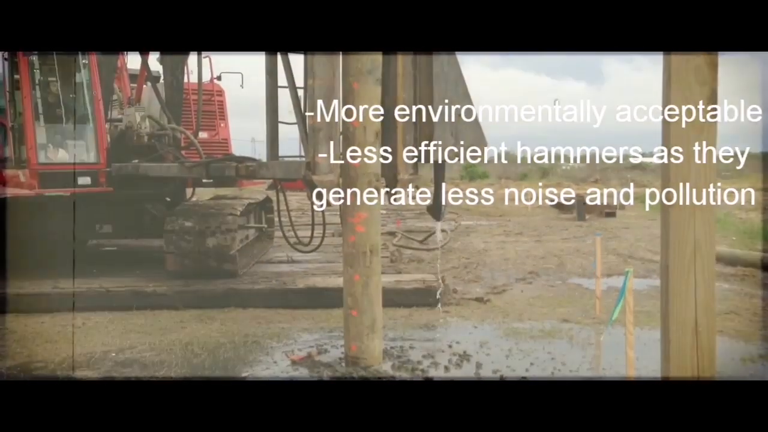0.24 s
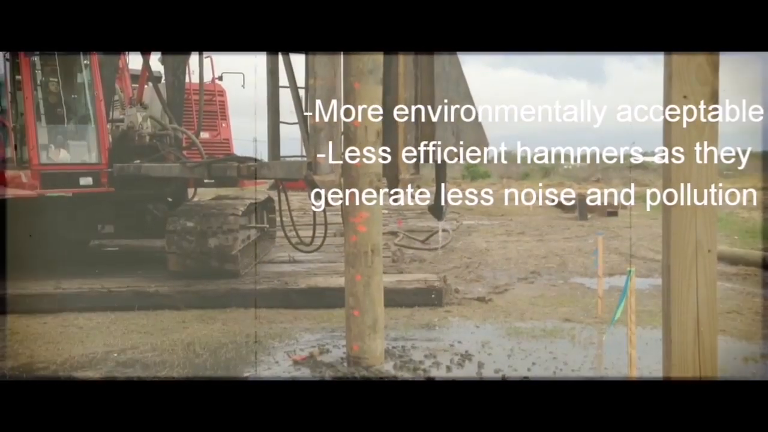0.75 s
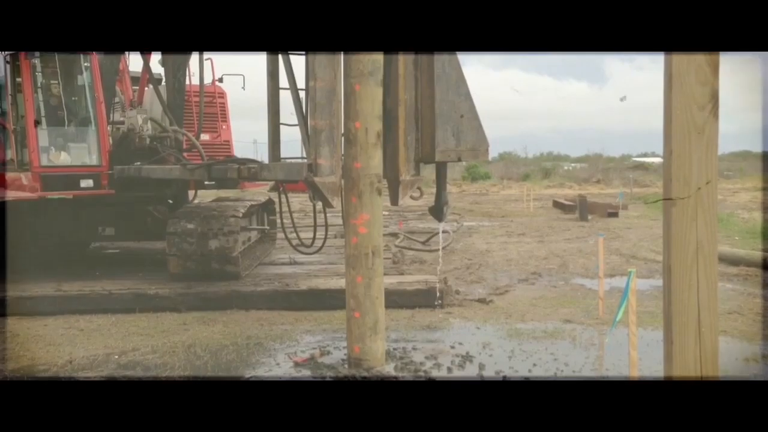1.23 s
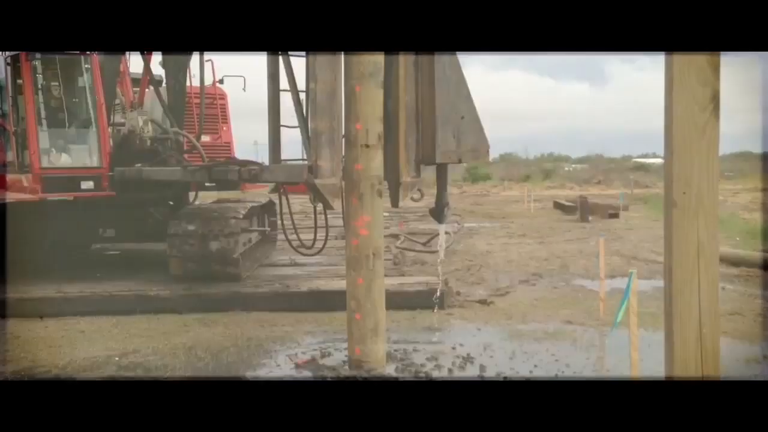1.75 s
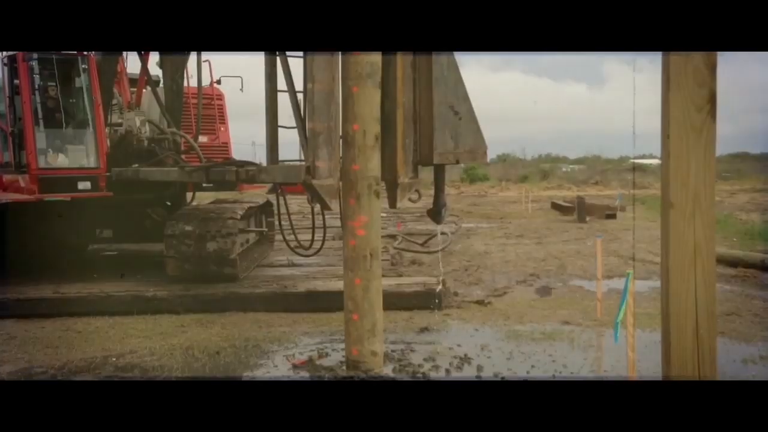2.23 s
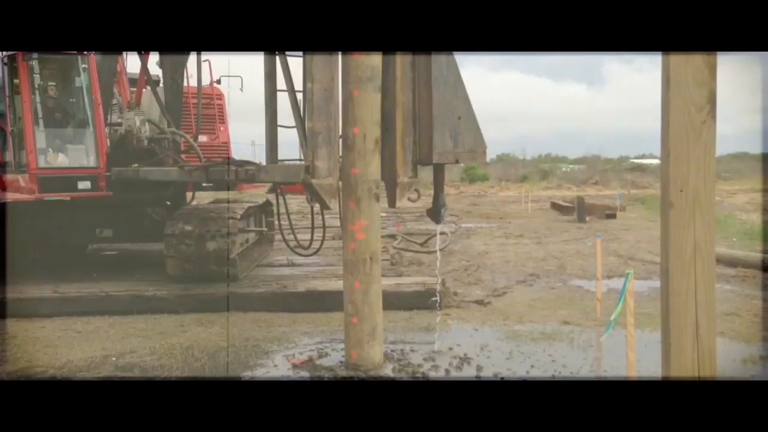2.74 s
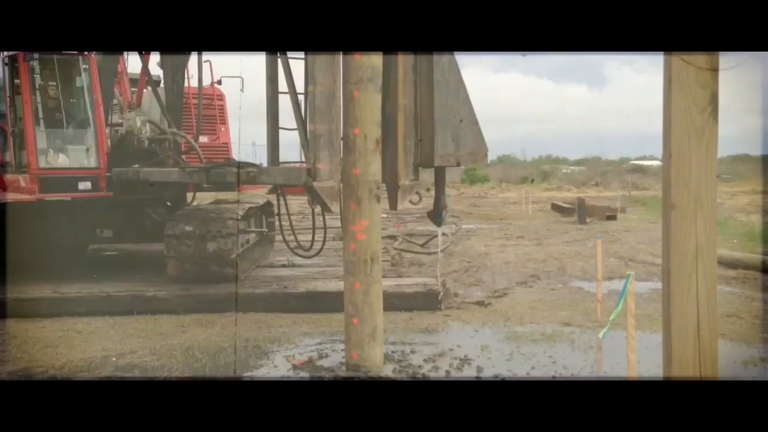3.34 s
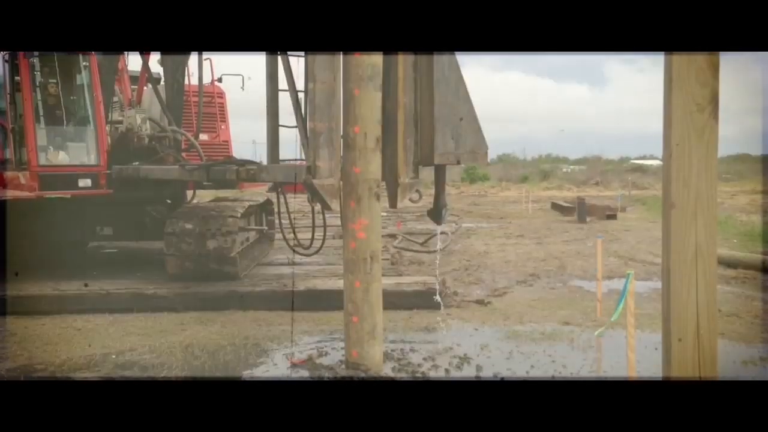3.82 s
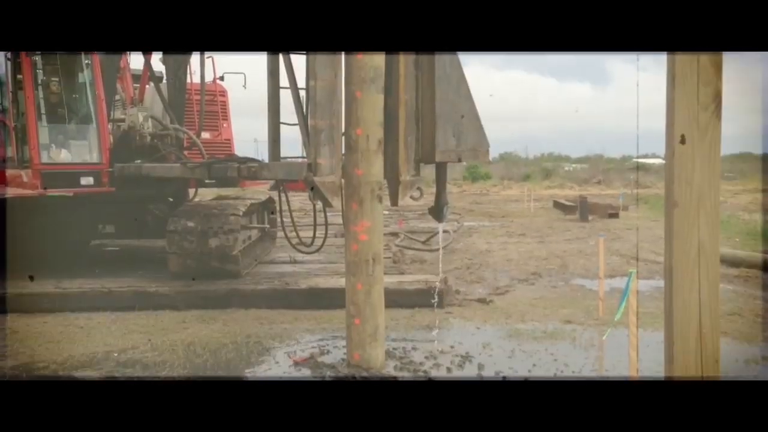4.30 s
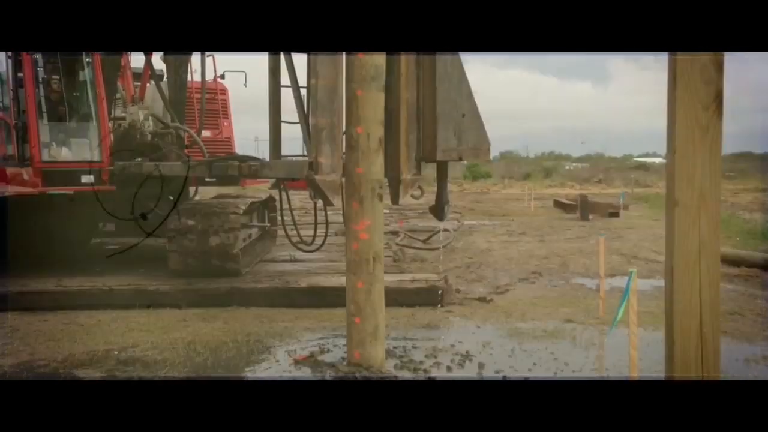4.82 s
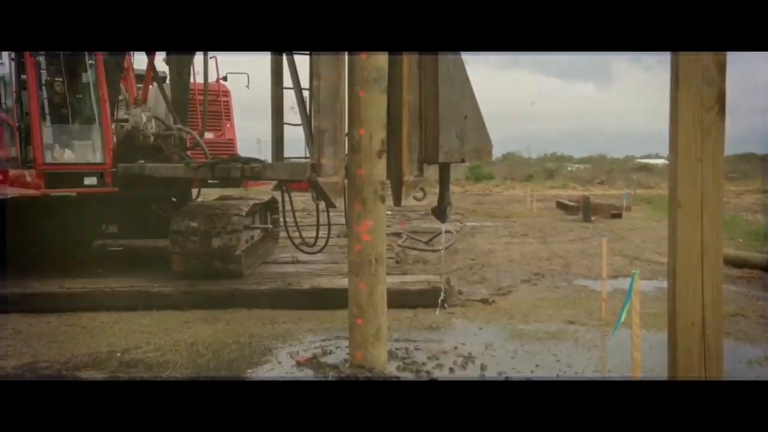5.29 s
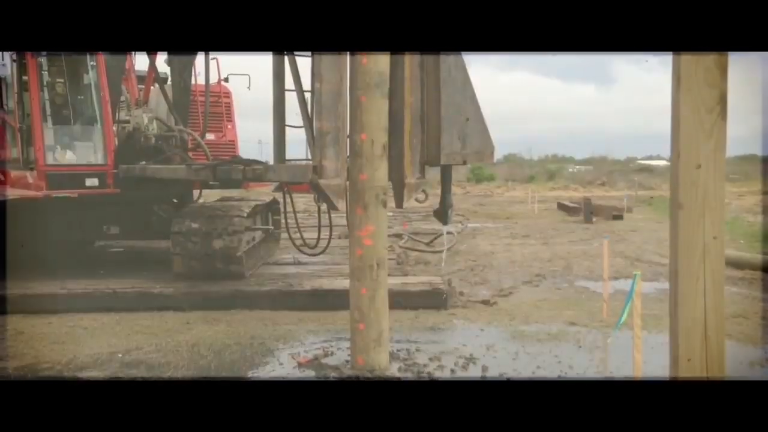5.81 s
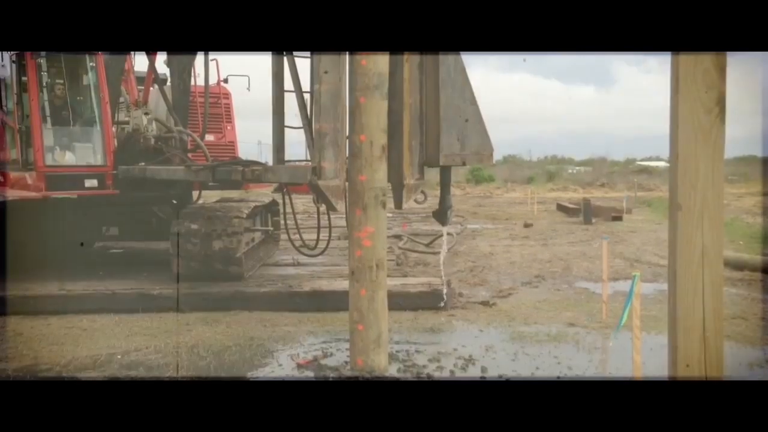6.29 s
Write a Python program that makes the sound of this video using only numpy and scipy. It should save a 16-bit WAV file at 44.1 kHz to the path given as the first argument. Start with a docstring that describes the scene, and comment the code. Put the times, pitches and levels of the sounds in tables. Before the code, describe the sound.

A diesel power pack runs throughout, a low fluttering drone with faint high pump whines, outdoors and heard in mono from fairly close. From 0 to 1.5 s strong, resonant oil hiss fills the foreground, slightly fizzy and easing a little. A dull guide knock leads into the first blow at 1.56 s: a deep, cushioned thump with little ring. Quieter, surging hiss lifts the ram until a valve gushes at 2.2 s and drains away. Soft knocks and a quick rising rush precede the second blow at 2.8 s, harder, with a steel crack, low thud, loose rebound rattle and ringing frame. The cycle repeats: gush at 3.5 s, brighter blow at 4.1 s, gush at 4.9 s, the sharpest clang at 5.4 s. Each rings under a second with a dull site echo. Hiss resumes, and a last gush at 6.35 s fades towards the end over the engine.

```python
"""A diesel power pack drones and whines while oil hisses through hoses, lifting the ram of a pile hammer.
The ram slides down and strikes: each of four blows cracks on steel, thumps the pile, rebounds and rings on.
After each blow oil lifts the ram again, until a valve lets go with a gush.
Flows and rattles are coloured noise, struck steel is a set of fading tones; a limiter flattens the loud peaks."""
import sys
import numpy as np
from scipy import signal
from scipy.fft import rfft, irfft, next_fast_len
from scipy.io import wavfile

SR = 44100
rng = np.random.default_rng(int(sys.argv[2]) if len(sys.argv) > 2 else 0)


def wrap_up_sound(samples):
    """Save the sound to the file named by the first command line argument, as 16-bit audio."""
    columns = np.atleast_2d(samples).T
    # keep every value between -1 and 1, then stretch to whole-number steps
    tamed = np.clip(columns, -1, 1)
    steps = np.round(tamed * 32767).astype(np.int16)
    wavfile.write(sys.argv[1], SR, steps)


N = 288855
TIME = np.arange(N) / SR  # seconds
TAIL = 32000  # length of each struck sound in samples
AFTER = np.arange(TAIL) / SR  # seconds since a strike
LIFT_ATTACK_S, VALVE_SHUT_S, GUSH_ATTACK_S = 0.024, 0.017, 0.028


def amp(db):
    """Turns decibels into a gain."""
    return 10 ** (np.asarray(db) / 20)


def unit(x):
    """Scales a signal to an rms of one."""
    return x / np.sqrt(np.mean(abs(x) ** 2) + 1e-20)


def add(mix, start_s, sound):
    """Lays a sound into the mix, cutting off what runs past the end."""
    part = mix[max(round(start_s * SR), 0):][:len(sound)]
    part += sound[:len(part)]


def noise(colour, size, ripple_db=0):
    """Random noise whose spectrum follows a colour table, with an optional ripple on top."""
    hz = np.fft.rfftfreq(size, 1 / SR)
    table_hz, table_db = np.transpose(colour)
    colour_db = np.interp(np.log(hz + 1), np.log(table_hz + 1), table_db)
    spectrum = rfft(rng.standard_normal(size)) * amp(colour_db + ripple_db)
    return unit(irfft(spectrum, size))


def wander(width_hz, size):
    """Slow random complex signal: it makes a sound waver in strength and phase."""
    coarse_s = np.arange(size // 64 + 2) * 64 / SR
    hz = np.fft.fftfreq(len(coarse_s), coarse_s[1])
    random_phase = np.exp(2j * np.pi * rng.random(len(coarse_s)))
    slow = np.fft.ifft(random_phase / (1 + (2 * hz / width_hz) ** 4))
    return np.interp(np.arange(size) / SR, coarse_s, unit(slow))


def swell(rise, t60):
    """Envelope that builds up in about rise seconds, then falls by 60 dB every t60 seconds."""
    build = 1 - np.exp(-(AFTER / rise) ** 2)
    return build * amp(-60 * np.maximum(AFTER - rise, 0) / t60)


def ring(modes, rough, width_hz):
    """Struck steel rings at its own pitches; loose contact makes each waver by the share rough."""
    out = np.zeros(TAIL)
    for hz, db, t60, rise in modes:
        waver = 1 - rough + rough * wander(width_hz, TAIL)
        tone = (waver * np.exp(2j * np.pi * hz * AFTER)).imag
        out += amp(db) * swell(rise, t60) * tone
    return out


def gate(start, end, attack, release):
    """A valve opens smoothly at start and shuts smoothly at end."""
    opening = 1 - np.exp(-(np.maximum(TIME - start, 0) / attack) ** 2)
    return opening * np.exp(-(np.maximum(TIME - end, 0) / release) ** 2)


def line(hz, db, width_hz, steady):
    """A machine tone that wavers, except for the share that holds steady."""
    waver = steady + (1 - steady) * wander(width_hz, N)
    return amp(db) * unit((waver * np.exp(2j * np.pi * hz * TIME)).real)


# Fan and engine noise. Each row: frequency in Hz, relative strength in dB per Hz.
PACK_COLOUR = [(15, -59), (25, -64), (91, -15.5), (173, -0.5), (258, -5.5), (578, -10.5), (644, -8.5),
               (798, -12), (3310, -18), (4000, -18.5), (4820, -22.5), (8250, -25), (8940, -27),
               (10200, -29.5), (15300, -37)]
# Exhaust drone. Each row: frequency in Hz, level in dB, width of the wavering in Hz.
EXHAUST_DRONE = [(164.8, -43.5, 18.4), (189.8, -50, 81)]
# Hydraulic pump whines. Each row: frequency in Hz, level in dB, width of the wavering in Hz.
PUMP_WHINES = [(2790, -59, 90), (4011, -53, 90), (5846, -65, 70), (8748, -64, 90)]


def power_pack():
    """A running diesel: fluttering fan and engine noise, a wavering exhaust drone and thin pump whines."""
    fan_and_engine = amp(-36) * noise(PACK_COLOUR, N) * amp(2.86 * wander(22, N).real)
    drone = sum(line(*row, steady=0) for row in EXHAUST_DRONE)
    whines = sum(line(*row, steady=0.49) for row in PUMP_WHINES)
    return fan_and_engine + drone + whines


# Strongest resonances of hoses and housing. Each row: frequency in Hz, width in Hz, boost in dB.
PIPE_RESONANCES = [(246, 13, 5), (291, 9.8, 4), (379, 38, 2), (1428, 15, 10.5), (1720, 48, 3),
                   (2030, 35, 4.5), (2410, 57, 1.5), (2732, 36, 8), (3060, 18, 2.5)]


def pipework(size, spacing_hz=28):
    """Hoses and housing boost a few pitches over a fine ripple, in dB, weaker in bass and treble."""
    hz = np.fft.rfftfreq(size, 1 / SR)
    heights_db = 2.1 * rng.standard_normal(4096)
    ripple_db = np.interp(hz / spacing_hz, np.arange(len(heights_db)), heights_db)
    ripple_db = ripple_db * hz / (hz + 400) / (1 + (hz / 8000) ** 2)
    return ripple_db + sum(db / (1 + (2 * (hz - f) / width) ** 2) for f, width, db in PIPE_RESONANCES)


# The long first lift. Each row: time in seconds, oil flow in dB,
# fizz in dB (only its distance below the highest value counts).
FIRST_LIFT_COURSE = [(0.0, -18.5, -11), (0.118, -19.5, -10), (0.854, -18.5, -14), (1.288, -22.5, -14.5),
                     (1.3, -22, -13.5)]
# Its colour. Each row: frequency in Hz, relative strength in dB per Hz.
FIRST_LIFT_COLOUR = [(60, -24), (130, -9.5), (270, 6), (450, -9), (1250, -5), (1420, 2), (2100, 1.5),
                     (2850, 4), (3200, 1), (4300, 2), (5900, 1), (7500, -4.5), (11000, -8.5), (15300, -15)]


def first_lift(ripple_db):
    """Turbulent oil is already lifting the ram; cavitation adds a treble fizz that changes with time."""
    hiss = noise(FIRST_LIFT_COLOUR, PADDED_SIZE, ripple_db)[:N]
    time_s, flow_db, fizz_db = np.transpose(FIRST_LIFT_COURSE)
    treble = signal.sosfiltfilt(signal.butter(2, 4500, "high", fs=SR, output="sos"), hiss)
    fizz_gain = amp(np.interp(TIME, time_s, fizz_db - fizz_db.max()))
    hiss = hiss + treble * (fizz_gain - 1)
    # a start before time zero leaves the valve open from the beginning
    valve = gate(-1, HAMMER_BLOWS[0][0], LIFT_ATTACK_S, VALVE_SHUT_S)
    return hiss * amp(np.interp(TIME, time_s, flow_db)) * valve


# The slide down to each blow. Each row: level at the blow in dB, growth in dB per second,
# how long it runs on in seconds, fading after that in dB per second.
RAM_FALLS = [(-15, 64, .006, 900), (-21, 170, 0.027, 230), (-23.5, 135, 0.059, 200), (-21, 153, .04, 230)]
# Its colour. Each row: frequency in Hz, relative strength in dB per Hz.
FALL_COLOUR = [(40, -40), (110, 0), (200, 4.5), (450, 0.5), (800, -5.5), (1300, 1.5), (1800, 6.5),
               (2700, 7.5), (3500, 3), (5500, 0), (7500, -5.5), (11000, -10.5), (15300, -15.5)]


def ram_falls(ripple_db):
    """The sliding ram gathers speed: its rush grows up to the blow, runs on a moment and dies."""
    gain = np.zeros(N)
    for (blow_s, *_), (db, growth, run_on_s, release) in zip(HAMMER_BLOWS, RAM_FALLS):
        t = TIME - blow_s
        gain += amp(db + growth * np.minimum(t, 0) - release * np.maximum(t - run_on_s, 0))
    return noise(FALL_COLOUR, PADDED_SIZE, ripple_db)[:N] * gain


# The lift after each blow. Each row: level in dB before sag and surges, sag in dB per second,
# surge strength as a factor, surge delay in seconds.
OIL_LIFTS = [(-27, 1.5, 0.34, 0.028), (-25, 7, .8, 0.019), (-29, 0.5, 1, 0.0058), (-27.5, 0.5, 0.76, 0)]
# The oil pressure rings after a blow. Each row: time after the blow in seconds (before the delay),
# change in dB (before the strength factor), half width in seconds.
PRESSURE_SURGES = [(.18, 4.5, 0.021), (.255, -2.5, 0.037), (.325, 5, .055), (.54, 3, 0.06)]
# Colour of the lift. Each row: frequency in Hz, relative strength in dB per Hz.
LIFT_COLOUR = [(80, -20.5), (300, 3), (550, -6.5), (1200, -7), (1500, 1), (2100, 2.5), (2500, 2), (2950, 2),
               (3400, -0.5), (4200, 2), (5700, 0), (7500, -8.5), (11000, -13.5), (15300, -17)]


def oil_lifts(ripple_db):
    """Oil lifts the ram from each blow until the valve lets go, surging and slowly sagging."""
    gain = np.zeros(N)
    for (blow_s, *_), (valve_s, *_), row in zip(HAMMER_BLOWS, VALVE_GUSHES, OIL_LIFTS):
        db, sag, strength, delay_s = row
        t = np.maximum(TIME - blow_s, 0)
        surges_db = sum(surge_db * np.exp(-((t - delay_s - s) / width) ** 2)
                        for s, surge_db, width in PRESSURE_SURGES)
        valve = gate(blow_s + 0.014, valve_s, LIFT_ATTACK_S, VALVE_SHUT_S)
        gain += amp(db - sag * t + strength * surges_db) * valve
    return noise(LIFT_COLOUR, PADDED_SIZE, ripple_db)[:N] * gain


# The valve at the top of each stroke. Each row: start in seconds, level in dB, time to fall
# by 10 dB in seconds, bend (a number over 1 means it holds first, then drains faster).
VALVE_GUSHES = [(2.172, -18.5, 0.16, 2.4), (3.501, -16.5, 0.13, 1.28), (4.898, -17.5, 0.17, 1.22),
                (6.351, -16, 0.16, 1.1)]
# Colour of the gush. Each row: frequency in Hz, relative strength in dB per Hz.
GUSH_COLOUR = [(88, -46), (150, -39), (230, 2), (263, -14.5), (351, -3.5), (387, -3), (498, -11.5),
               (604, -3.5), (777, -10), (980, -7.5), (1240, -10.5), (1470, -5), (3130, -1), (10400, -14),
               (15300, -23.5)]


def valve_gushes(ripple_db):
    """The released oil gushes: the valve opens quickly, then the pressure drains."""
    gain = np.zeros(N)
    for start_s, db, drain_s, bend in VALVE_GUSHES:
        t = np.maximum(TIME - start_s, 0)
        drained = np.maximum(t - GUSH_ATTACK_S, 0) / drain_s
        gain += amp(db - 10 * drained ** bend) * (1 - np.exp(-(t / GUSH_ATTACK_S) ** 2))
    return noise(GUSH_COLOUR, PADDED_SIZE, ripple_db)[:N] * gain


PADDED_SIZE = next_fast_len(N)  # a length in samples that transforms quickly


def hydraulics():
    """Turbulent oil and the sliding ram, all heard through the same pipework, flutter slightly."""
    ripple_db = pipework(PADDED_SIZE)
    flow = first_lift(ripple_db) + ram_falls(ripple_db) + oil_lifts(ripple_db) + valve_gushes(ripple_db)
    return flow * amp(0.67 * wander(42, N).real)


# The ram knocks in its guides. Each row: start in seconds, level in dB, time to fall 60 dB in seconds.
GUIDE_KNOCKS = [(1.472, -25, 0.16), (1.555, -7.5, 0.081), (1.591, -19, 0.34), (2.752, -21, 0.11),
                (2.868, -17, 0.071), (2.985, -22.5, 1), (4.036, -22, .12), (4.148, -15, 0.078),
                (5.397, -17.5, 0.12)]
# Their colour. Each row: frequency in Hz, relative strength in dB per Hz.
KNOCK_COLOUR = [(50, -40), (120, -28), (200, -5.5), (420, 4), (700, -5.5), (1000, -4), (1400, -11),
                (3000, -15.5), (8000, -55)]


def guide_knocks():
    """The ram knocks against its guides: bursts of dull noise."""
    out = np.zeros(N)
    for start_s, db, t60 in GUIDE_KNOCKS:
        add(out, start_s, amp(db) * noise(KNOCK_COLOUR, TAIL) * swell(rise=0.0049, t60=t60))
    return out


def tilted(modes, hardness_db, pivot_hz):
    """A hard contact favours an object's high modes, a cushioned one its low modes."""
    return [(hz, db + hardness_db * np.log2(hz / pivot_hz), t60, rise) for hz, db, t60, rise in modes]


def dulled(rows, hardness_db, above_hz=1400):
    """A cushioned contact takes treble off, a hard one adds it."""
    slope_db = 0.45 * hardness_db  # per octave: the share of the hardness that reaches the treble
    return [(hz, db + slope_db * max(np.log2(hz / above_hz), 0), *rest) for hz, db, *rest in rows]


# Colour of the contact crack. Each row: frequency in Hz, relative strength in dB per Hz before hardness.
CRACK_COLOUR = [(40, -30), (130, -36), (300, -16), (750, -11), (950, -8), (1400, -2), (1800, -18),
                (2500, 1.5), (3600, -20), (4400, -42), (8000, -49), (15000, -56)]
# Steel anvil, answering at once. Each row: frequency in Hz, relative level in dB before hardness,
# time to fall 60 dB in seconds, rise in seconds.
ANVIL_MODES = [(787, -3, 0.036, 0.0022), (1028, -6, 0.056, 0.0026), (1146, 2.5, 0.047, 0.0013),
               (1336, -2, 0.051, 0.00086), (1453, -3, 0.062, 0.0018), (1580, -21, .1, 0.0022),
               (2164, -10.5, 0.21, .004), (2210, -16, 0.15, 0.0041), (2280, -7, 0.35, 0.006),
               (2444, -13, 0.047, .005), (2484, -9, .05, 0.0028), (2895, -17, 0.037, .004),
               (3576, -7.5, 0.11, 0.0029), (3760, -18, 0.33, 0.012)]


def anvil(hardness_db):
    """The ram hits the steel anvil: a sharp crack of noise and a quick ring."""
    crack = amp(1.5) * noise(dulled(CRACK_COLOUR, hardness_db), TAIL) * swell(rise=0.0018, t60=0.064)
    return crack + ring(dulled(ANVIL_MODES, hardness_db), rough=0.25, width_hz=40)


# Colour of the rebound rattle. Each row: frequency in Hz, relative strength in dB per Hz.
RATTLE_COLOUR = [(40, -33), (100, -8), (170, -7), (400, 6), (750, -3), (900, -1), (1400, -12), (1750, 1),
                 (2250, 6), (2900, -14), (5500, -7), (7200, -23), (7850, -11), (8600, -25), (15000, -35)]


def rebound(out, start_s, db):
    """The housing drops back: a loose, wavering rattle that strikes the anvil again."""
    rattle = noise(RATTLE_COLOUR, TAIL) * swell(rise=0.0056, t60=0.18)
    rattle = rattle * amp(10.0 * wander(280, TAIL).real)
    add(out, start_s - 0.01, amp(db) * rattle)
    add(out, start_s - 0.003, amp(db) * ring(ANVIL_MODES, rough=0.8, width_hz=120))


# The hammer's frame. Each row: frequency in Hz, relative level in dB before the landing spot counts,
# time to fall 60 dB in seconds, rise in seconds.
FRAME_MODES = [(452, 0, 0.48, 0.055), (549, 7.5, 0.45, 0.065), (1105, 1, 0.28, .12), (1162, -6, 0.5, 0.093),
               (2270, -1, 0.3, 0.033), (2970, 5, 0.56, 0.11)]


def frame(nearest_hz):
    """Where the ram lands decides which of the frame's modes answer most."""
    modes = [(hz, db - 8 * abs(np.log2(hz / nearest_hz)), t60, rise) for hz, db, t60, rise in FRAME_MODES]
    return ring(modes, rough=0.52, width_hz=45)


# The four blows. Each row: start in seconds, anvil level in dB, cap level in dB, pile level in dB,
# hardness of contact in dB per octave, pile lag in seconds, rebound level in dB, rebound lag in seconds,
# frame level in dB, pitch near which the frame rings most in Hz, mast level in dB, echo level in dB.
HAMMER_BLOWS = [(1.562, -17.5, -7.5, -3, -7.5, 0.0015, -37, 0.033, -25.5, 390, -59, -32),
                (2.786, -8.5, -6.5, -4.5, -4, 0.0087, -14, 0.036, -14.5, 740, -23.5, -21),
                (4.076, -7.5, -2.5, -4.5, -1.5, 0.0072, -15, 0.033, -17, 1400, -23, -19.5),
                (5.441, -7.5, -4.5, -3.5, 1.5, 0.0058, -15, 0.038, -21, 1570, -17, -19.5)]
# Heavy cap taking the load. Each row: frequency in Hz, relative level in dB before hardness,
# time to fall 60 dB in seconds, rise in seconds.
CAP_MODES = [(336, -2.5, 0.09, 0.0054), (391.2, -2.5, .17, 0.0072), (452.4, -2, 0.071, 0.0071),
             (615, -0.5, 0.09, 0.0041), (673, -11, 0.45, 0.0058), (698.5, -1.5, 0.21, 0.004)]
# The pile on its cushion. Each row: frequency in Hz, relative level in dB before hardness,
# time to fall 60 dB in seconds, rise in seconds.
PILE_MODES = [(47.4, -30, 0.043, 0.0065), (135, -27, 0.24, 0.0093), (167, -10, 0.13, 0.03),
              (193, 8.5, 0.042, 0.0094)]
# The mast, slow to take up the ring. Each row: frequency in Hz, relative level in dB,
# time to fall 60 dB in seconds, rise in seconds.
MAST_MODES = [(1327, 3, 0.43, 0.15), (1350, -9, .4, 0.1), (1292, -2.5, 0.47, 0.15)]
# Colour of the site echo. Each row: frequency in Hz, relative strength in dB per Hz.
ECHO_COLOUR = [(50, -35), (100, -11), (170, 5.5), (400, 10), (650, 7.5), (900, 3), (1250, 2.5), (1700, -16),
               (2300, -9), (4000, -36), (10000, -50)]


def hammer():
    """The ram hits anvil and cap, the pile takes the load, the housing drops back, frame and mast ring."""
    out = np.zeros(N)
    for (s, anvil_db, cap_db, pile_db, hardness_db, pile_lag, rebound_db, rebound_lag,
         frame_db, frame_hz, mast_db, echo_db) in HAMMER_BLOWS:
        cap = ring(tilted(CAP_MODES, hardness_db, pivot_hz=410), rough=0.2, width_hz=50)
        pile = ring(tilted(PILE_MODES, hardness_db, pivot_hz=184), rough=0.18, width_hz=40)
        mast = ring(MAST_MODES, rough=0.58, width_hz=60)
        # the rig and the open ground scatter a dull tail
        echo = noise(ECHO_COLOUR, TAIL) * swell(rise=0.032, t60=1.0)
        add(out, s, amp(anvil_db) * anvil(hardness_db))
        add(out, s, amp(cap_db) * cap)
        add(out, s + pile_lag, amp(pile_db) * pile)
        rebound(out, s + rebound_lag, rebound_db)
        add(out, s, amp(frame_db) * frame(frame_hz))
        add(out, s, amp(mast_db) * mast)
        add(out, s, amp(echo_db) * echo)
    return out


def scene():
    """Everything reaches one microphone, so both channels are the same."""
    mono = power_pack() + hydraulics() + guide_knocks() + hammer()
    return np.array([mono, mono])


def record(dry):
    """A soft limiter squashes loud peaks under a ceiling; then the top treble is cut."""
    ceiling = 0.97
    squashed = dry / (1 + (dry / ceiling) ** 4) ** (1 / 4)
    lowpass = signal.firwin(1023, 15400, window=("kaiser", 9), fs=SR)  # cutoff in Hz
    return signal.oaconvolve(squashed, lowpass[None], "same")


dry = scene()
out = record(dry)
wrap_up_sound(out)
```